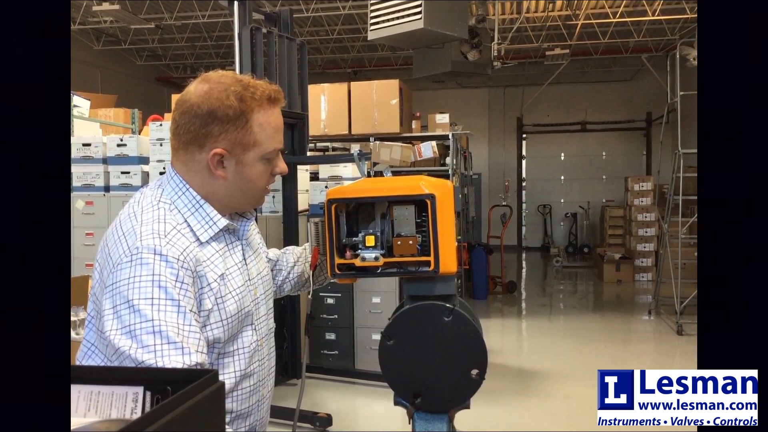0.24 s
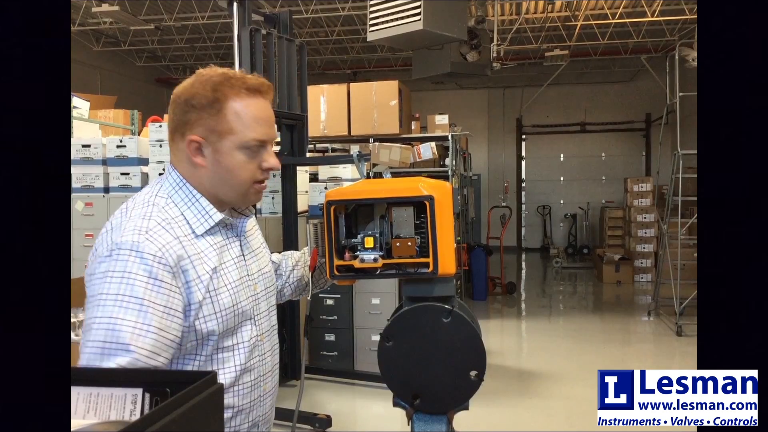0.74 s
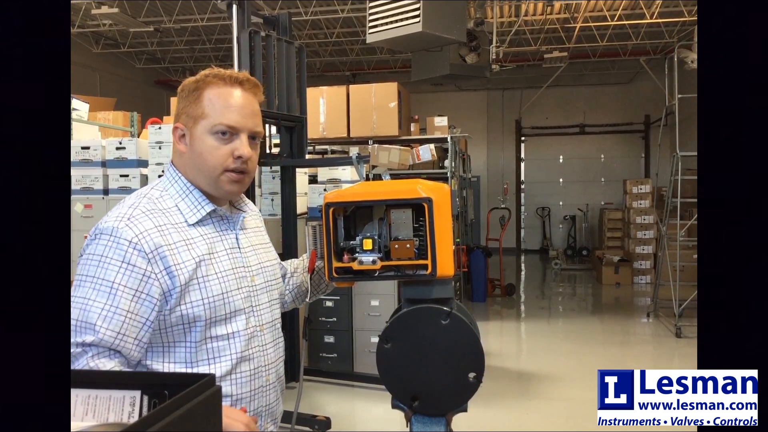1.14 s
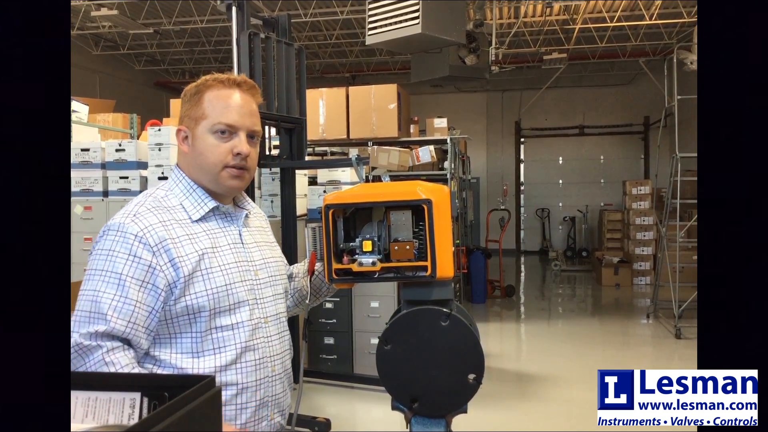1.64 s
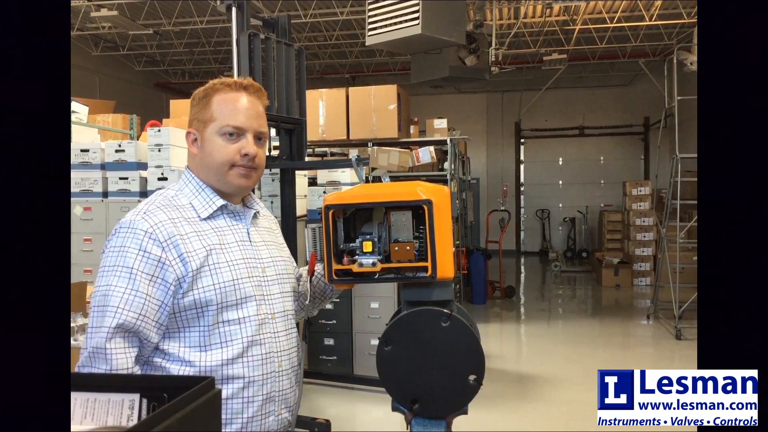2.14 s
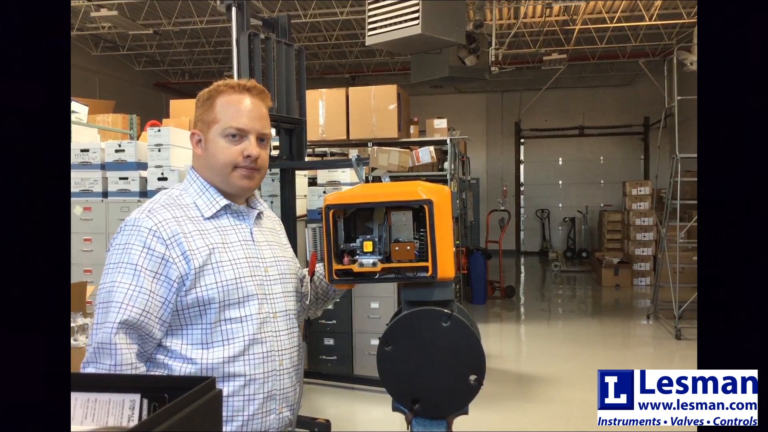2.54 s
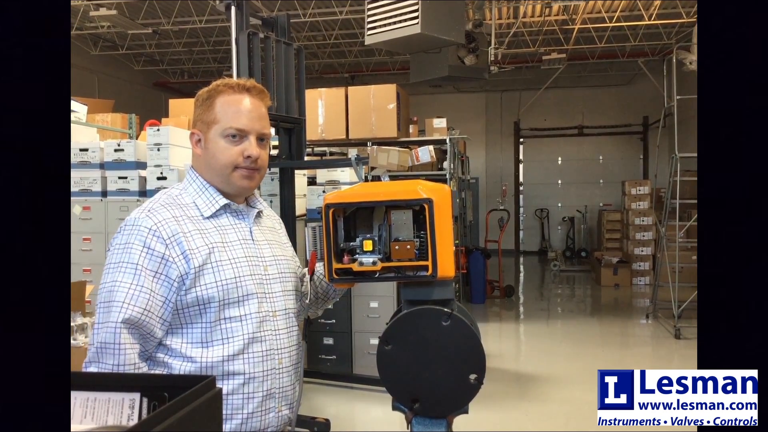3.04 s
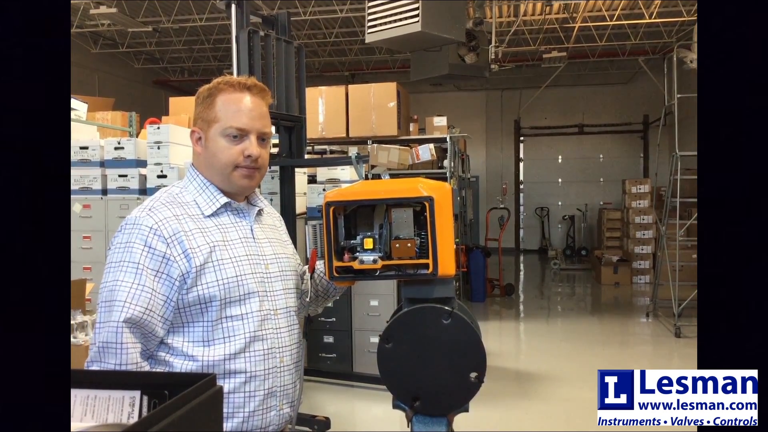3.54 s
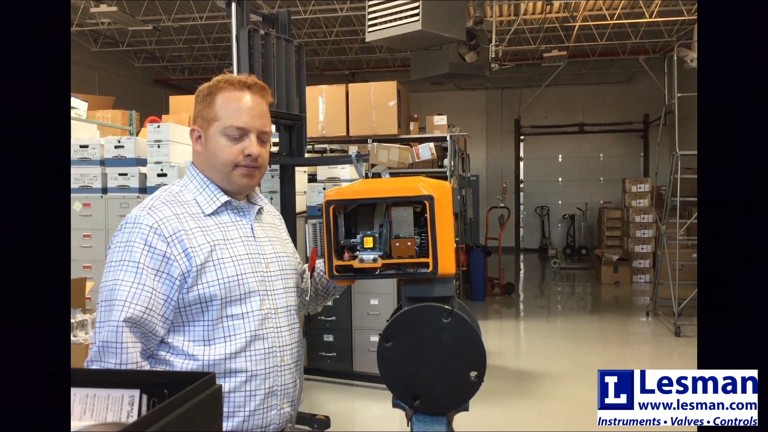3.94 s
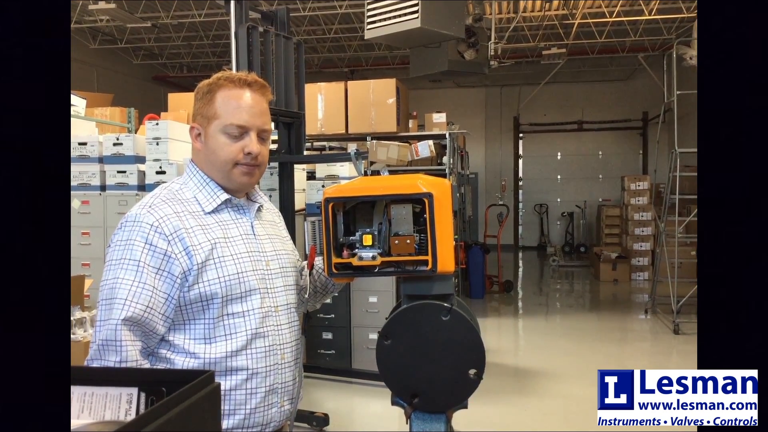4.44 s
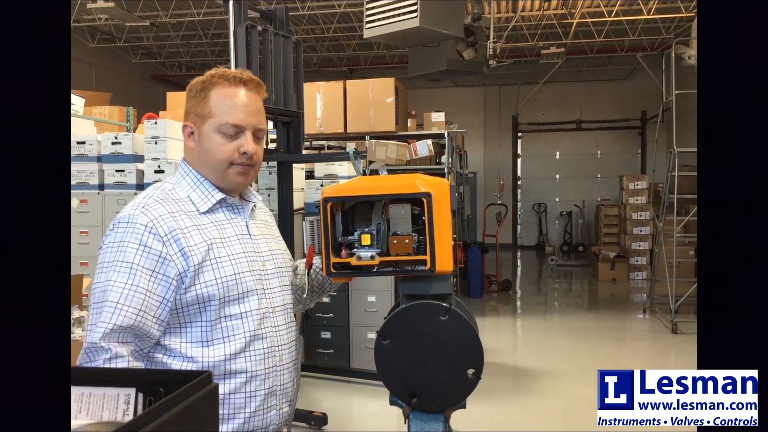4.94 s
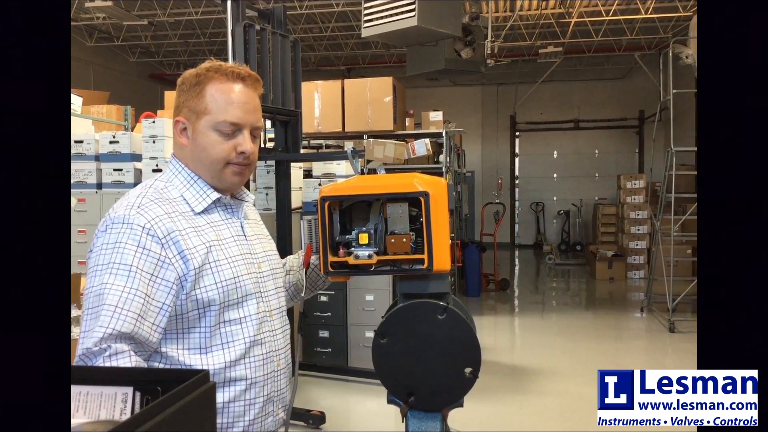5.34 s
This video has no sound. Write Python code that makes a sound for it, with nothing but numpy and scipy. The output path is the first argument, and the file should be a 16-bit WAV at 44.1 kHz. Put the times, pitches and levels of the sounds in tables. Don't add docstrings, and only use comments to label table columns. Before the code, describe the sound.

Close beside an electric valve actuator in a large reverberant warehouse, a motor whines over ventilation hum. Light ticks lead into a violent metal snap that overloads the microphone, with a hollow boom and quick rebounds. The gears then bite, a dull knock follows, and a steady hum with gritty rattle carries on, swelling slightly at the end.

```python
import sys
import numpy as np
from scipy import signal
from scipy.fft import rfft, irfft
from scipy.io import wavfile
from scipy.ndimage import uniform_filter1d

SR = 44100
rng = np.random.default_rng(int(sys.argv[2]) if len(sys.argv) > 2 else 0)


def unload_wav(signal):
    wavfile.write(
        sys.argv[1],
        SR,
        np.round(np.clip(np.atleast_2d(signal).T, -1, 1) * 32767).astype(np.int16),
    )


def elevation(decibels):
    levels = np.asarray(decibels, float)
    return 10 ** (levels / 20)


N = 246546

# (frequency [Hz], rms level [dB])
FAN_TONES = [(59.2, -56.5), (118.4, -55), (204.6, -55.5), (296.1, -53), (333.8, -58), (360.7, -63.5),
             (398.4, -72)]
# (frequency [Hz], density [dB per Hz])
AIR = [(15, -39), (25, -2), (113, -3.5), (135, -2.5), (162, -7), (205, -5), (243, -3.5), (295, -5),
       (354, -12), (436, -20.5), (515, -12.5), (584, -18), (700, -9.5), (910, -53.5), (1540, -120)]
# (multiple of the shaft [-], multiple of the 120 Hz magnet pull [-])
ORDERS = [(14, 0), (16, 0), (17, -1), (17, 0), (18, 0), (17, 1), (20, 0), (17, 2), (28, -1), (27, 0),
          (28, 0), (29, 0), (28, 1), (28, 2), (35, -1), (35, 0), (35, 1), (38, 0), (40, 0), (42, 0),
          (42, 1), (46, 0), (49, -1), (48, 0), (49, 0), (49, 1), (56, -1), (56, 0), (63, 0), (77, 1)]
# (gears just in [dB], gears seated [dB])
ORDER_LEVELS = [(-92, -64), (-59, -59.5), (-64.5, -60), (-52, -53), (-62, -66.5), (-52.5, -59.5),
                (-65, -72), (-63, -62), (-84, -66.5), (-66, -65.5), (-62, -55.5), (-61, -59),
                (-61.5, -55.5), (-64, -63.5), (-61, -59.5), (-55.5, -57), (-58.5, -63.5), (-64, -68),
                (-61, -62.5), (-64, -56.5), (-64.5, -64), (-73, -77.5), (-63, -66), (-67, -73), (-66, -61),
                (-58, -63.5), (-78, -66), (-67, -68.5), (-70, -80.5), (-70.5, -74.5)]
# (frequency [Hz], density [dB per Hz])
IDLE = [(450, -12), (660, -8), (700, 3), (740, -8), (900, -13), (1500, -12.5)]
# (frequency [Hz], density [dB per Hz])
RATTLE = [(240, -40), (400, -16), (738, -6), (952, -3), (1040, -4.5), (1290, -5.5), (1640, -3), (2020, 3.5),
          (2100, -14), (2310, 7.5), (2510, -7), (2860, -0.5), (3800, -51.5), (4940, -75.5), (8360, -120)]
# (frequency [Hz], density [dB per Hz])
HISS = [(1940, -14.5), (3300, 0), (3790, -11.5), (4150, -10), (4580, -8.5), (5350, -14), (7090, -13.5),
        (10900, -18), (13000, -24.5), (14600, -26), (15800, -27)]
# (frequency [Hz], width [Hz], level [dB])
COVER = [(3970, 57, -11.5), (4450, 63, -1.5), (5050, 48, -7.5), (6020, 140, -4.5), (6430, 42.3, -12),
         (7020, 180, -1.5), (7240, 58, -10), (8000, 52, -15), (8900, 170, -10), (9860, 250, -21)]
# (frequency [Hz], t60 [s], level [dB])
HALL = [(100, 3.4, 5), (252.2, 1.1, 10), (600, 0.83, 1), (1331, 1.03, 7.5), (2000, 1.66, 0.5),
        (3003, 0.97, 8.5), (4600, 0.96, -3), (7200, 0.29, -2.5), (11000, 0.42, -1), (15000, 0.23, -2.5)]
# (multiple of its centre [-], level [dB])
HALL_BAND = [(1 / 2.4, -14), (1, 0), (1.7, -8), (3.56, -36)]
# (frequency [Hz], density [dB per Hz])
WALLS = [(210, -17.5), (350, -3.5), (404, -13), (452, -5), (882, -7), (925, -22.5), (1420, -4.5),
         (2190, -11.5), (3410, -9.5), (3880, -11), (4200, -10.5), (4620, -13), (15800, -16)]
# (time [s], peak level [dB], brightness [dB per octave], crack decay [s], tail share [-])
BLOWS = [
    (0.2603, -28.5, 0.5, 0.028, .03),
    (0.2824, -18.5, 7.5, 0.014, .03),
    (0.311, -22, 3, 0.011, .03),
    (.3150, 6, 3, 0.0044, 0.14),
    (0.3604, -7.5, 3, 0.0085, .03),
    (.3900, -11, 1, 0.0032, .03),
    (0.4358, -18, -1, 0.008, .03),
    (1.7323, -23.5, -2, 0.0064, 0.055),
]
# (frequency [Hz], density [dB per Hz])
CRACK = [(240, -15.5), (400, -3), (544, -19.5), (917, -11.5), (1640, -2.5), (2380, -10), (2690, -12),
         (5800, -19.5), (7650, -25.5), (9480, -24), (10400, -29), (13300, -29.5), (15800, -33.5)]
# (frequency [Hz], width [Hz], level [dB])
LATCH = [(1893, 100, -3), (3660, 150, 4), (4960, 99, -0.5), (6060, 110, -6.5), (7580, 220, -23.5),
         (9150, 130, 1), (10640, 80, -13.5), (11230, 81, -4.5), (11400, 190, -9), (14800, 97, -8)]
# (frequency [Hz], width [Hz], level [dB])
METAL = [(1580, 120, -7.5), (2374, 20, -3), (3185, 110, -3), (4570, 97, -5), (5150, 240, -11.5),
         (5800, 91, -8), (6740, 160, -24), (8600, 160, -18), (9600, 100, -6.5), (11200, 230, -8.5),
         (12000, 44, -15), (13200, 81, -25), (12540, 110, -27), (13330, 110, -17)]
# (frequency [Hz], width [Hz], level [dB])
KNOCK = [(520, 160, -22), (2030, 150, 8), (2240, 86, 5), (3010, 110, -3), (3550, 95, 0), (5270, 150, -4),
         (9500, 170, -30), (10800, 98, -15), (11500, 88, -15), (12900, 110, -30)]
# (frequency [Hz], level [dB], t60 [s])
HOUSING = [(78, -36, .7), (97, -27, .8), (148, -32.5, 0.68), (196.5, -27, 0.496), (408, -28, 0.33),
           (518, -34.5, 0.34), (710, -23, 0.28)]
# (frequency [Hz], density [dB per Hz])
GRIT = [(3000, -6), (3400, 0), (4500, -1.5), (5600, -15)]
# (time [s], peak level [dB])
TICKS = [
    (1.2653, -51),
    (1.3458, -33),
]
# (frequency [Hz], width [Hz], level [dB])
TICK_RING = [(5030, 92, -0.5), (7030, 96, -9), (7820, 190, -9), (9900, 94, -13), (10800, 170, -6),
             (13700, 120, -4), (14240, 89, -6), (14700, 120, 3)]
# (frequency [Hz], density [dB per Hz])
TICK_COLOUR = [(2500, -19), (4600, -3), (6000, -13), (9000, -12), (12000, -13), (14000, -16), (15300, -8.5)]
# (frequency [Hz], density [dB per Hz])
BEARING = [(7700, -23), (8150, -4), (8600, -17)]
# (frequency [Hz], width [Hz], level [dB])
SCRAPE = [(4300, 600, 3), (5340, 260, -4), (6440, 140, -5), (7500, 1000, -10)]

SNAP_S, REBOUND_S, SECOND_REBOUND_S, KNOCK_S = [BLOWS[i][0] for i in (3, 4, 5, 7)]
SEAT_S = 0.38
FREE_HZ, BITE_S, DROP_HZ, DROP_S, CREEP_HZ, CREEP_S = 58.1, .92, .39, .066, 1.19, .55
WHEEL_HZ, WHEEL_TURN_S, WHEEL_EASY_S, CLOSING_S, CLOSING_HZ_PER_S = .17, 1.45, 3.23, 4.7, .34
FREE_SLOT_DB, FREE_SHAFT_DB, FREE_TOOTH_DB, SLOTS = 4, -4, -12, 17
RATTLE_DB, CLOSING_DB_PER_S, HISS_DB = -49.5, 5.5, -59.5
BUZZ_DB, BUZZ_DB_PER_S, DRONE_DB, DRONE_DB_PER_S = -61.5, 2, -56.5, 1.28
HOUSING_HZ, SWING_DB, SWING_RISE_S, SWING_T60_S = 292, .5, .011, .33
DIP_DB, DIP_LAG_S, DIP_S = -8, .011, .0025
THROB_DB, THROB_HZ, THROB_T60_S = -21, 21, .75


def walk(rate):
    k = int(SR / rate)
    held = np.repeat(rng.standard_normal(N // k + 1), k)
    return 1.214 * uniform_filter1d(uniform_filter1d(held, k), k)[:N]


def shaped(x, points):
    hz, db = np.transpose(points)
    bins_hz = np.arange(len(x) // 2 + 1) * SR / len(x) + 1
    gain = elevation(np.interp(np.log(bins_hz), np.log(hz), db, left=-99, right=-99))
    return irfft(rfft(x) * gain, len(x)) / np.sqrt(np.mean(gain ** 2))


def coloured(points, size):
    return shaped(rng.standard_normal(size), points)


def ring(x, hz, t60):
    pole = np.exp(2j * np.pi * hz / SR - np.log(1000) / (t60 * SR))
    return signal.lfilter([1], [1, -pole], x).imag


def parts(shake, table, damping):
    out = sum(elevation(db) * ring(shake, hz, 2.2 / (damping * width)) for hz, width, db in table)
    return out / np.max(np.abs(out))


def tones(hz, db, flutter_db, rate, rough):
    grain = 1 + rough * (walk(45) + 1j * walk(45))
    spin = np.exp(2j * np.pi * (np.cumsum(hz * np.ones(N)) / SR + rng.random()))
    return elevation(db + flutter_db * walk(rate)) * np.sqrt(2) * (grain * spin).real


def hum():
    t = np.arange(N) / SR
    buzz_db = BUZZ_DB + BUZZ_DB_PER_S * np.minimum(t, CLOSING_S)
    buzz = tones(119.9, buzz_db, 1.8, 2.0, rough=0.14)
    drone_db = DRONE_DB + DRONE_DB_PER_S * t + 1.5 * walk(8)
    drone = ring(rng.standard_normal(N), 296, .17)
    fans = sum(tones(hz, db - 2.0, 1.67, 7, rough=0.2) for hz, db in FAN_TONES if not 100 < hz < 130)
    air = elevation(-52) * coloured(AIR, N)
    return buzz + elevation(drone_db) * drone / np.std(drone) + fans + air


def shaft_hz(t):
    since = np.maximum(t - BITE_S, 0)
    bitten = 1 - np.exp(-since / DROP_S)
    wheel = WHEEL_HZ * np.cos(2 * np.pi * (t - WHEEL_EASY_S) / WHEEL_TURN_S)
    creep = CREEP_HZ * (1 - np.exp(-since / CREEP_S))
    closing = CLOSING_HZ_PER_S * np.maximum(t - CLOSING_S, 0)
    return FREE_HZ + bitten * (wheel - DROP_HZ) - creep - closing


def whine(shaft, surge_db):
    t, out = np.arange(N) / SR, 0
    turning_points = [BITE_S, BITE_S + 2 * DROP_S, KNOCK_S, KNOCK_S + SEAT_S]
    for (turns, pulls), (in_db, seated_db) in zip(ORDERS, ORDER_LEVELS):
        hz = turns * shaft + pulls * 120
        free_db = FREE_TOOTH_DB if turns > 20 else FREE_SHAFT_DB
        if turns == SLOTS:
            free_db = FREE_SLOT_DB
        db = np.interp(t, turning_points, [seated_db + free_db, in_db, in_db, seated_db])
        if turns > 20:
            out = out + tones(hz, db + 1.5 + surge_db, 1.9, 14, rough=.65)
        else:
            out = out + tones(hz, db - .6, 1.5, 5, rough=.2)
    return out


def idle():
    loose = np.clip((BITE_S + DROP_S - np.arange(N) / SR) / DROP_S, 0, 1)
    return elevation(-57) * loose * coloured(IDLE, N)


def combed(x):
    echoes = rng.standard_normal(1500) * np.exp(-np.arange(1500) / SR / .008)
    return .85 * x + .55 * signal.fftconvolve(x, echoes / np.linalg.norm(echoes))[:len(x)]


def rattle(surge_db):
    closing_db = CLOSING_DB_PER_S * np.maximum(np.arange(N) / SR - CLOSING_S, 0)
    gears = elevation(RATTLE_DB + closing_db + surge_db) * coloured(RATTLE, N)
    cover = parts(rng.standard_normal(N), COVER, 0.44)
    hiss = combed(coloured(HISS, N)) + elevation(-8.5) * cover / np.std(cover)
    return gears + elevation(HISS_DB + 0.71 * surge_db) * hiss


def grit():
    t = np.arange(N) / SR
    worn_db = 20 * np.clip((t - KNOCK_S) / .98, 0, 2) ** 2
    bitten = np.clip((t - BITE_S) / DROP_S, 0, 1)
    return elevation(-62.5 - worn_db + 2 * walk(9.04)) * bitten * coloured(GRIT, N)


def bearing():
    db = np.interp(np.arange(N) / SR, [2.2, 5.3], [-86, -71])
    return elevation(db + 2.5 * walk(5.33)) * coloured(BEARING, N)


def motor():
    t = np.arange(N) / SR
    shaft = shaft_hz(t)
    surge_db = 1.3 * walk(16)
    surge_db = surge_db - uniform_filter1d(surge_db, size=SR // 4)
    tooth_beat = .1 * np.cos(2 * np.pi * np.cumsum(shaft) * 7 / SR)
    pull = 1 + .12 * np.cos(2 * np.pi * 120 * t) + tooth_beat
    return whine(shaft, surge_db) + idle() + pull * (rattle(surge_db) + grit()) + bearing()


def hall(tilt_db, age_s):
    t, out = np.arange(SR * 2) / SR, 0
    for hz, t60, db in HALL:
        band = coloured([(hz * ratio, level) for ratio, level in HALL_BAND], len(t))
        fade_db = db + tilt_db * np.log2(hz / 2000) - 60 * (t + age_s) / t60
        out = out + np.sqrt(hz / 2000) * elevation(fade_db) * band
    return out


def earlier_snap():
    out = np.zeros(N)
    out[:SR * 2] = elevation(-33.5) * hall(1.5, 0.24)
    return out


def lever():
    near, sent, t = np.zeros(N), np.zeros(N), np.arange(16384) / SR
    metal = METAL, -7.5
    struck = [metal, (LATCH, -1.2)] + [metal] * 5 + [(KNOCK, -4.5)]
    for (s, db, tilt_db, crack_s, tail), (part, ring_db) in zip(BLOWS, struck):
        start = int(s * SR)
        colour = [(hz, level + tilt_db * np.log2(hz / 2000)) for hz, level in CRACK]
        crack = coloured(colour, len(t)) * (np.exp(-t / crack_s) + tail * np.exp(-t / .035))
        shake = rng.standard_normal(len(t)) * np.exp(-t / .004)
        ringing = elevation(db + ring_db) * parts(shake, part, 0.67)
        near[start:start + len(t)] += elevation(db - 6) * crack + ringing
        sent[start] = elevation(db - 8.0) * np.sqrt(crack_s * SR / 2)
    return near, sent


def housing():
    t = np.arange(N) / SR

    def dipped(s):
        return (1 + np.tanh((t - s - DIP_LAG_S) / DIP_S)) / 2

    since = np.maximum(t - SNAP_S, 0)
    swing_db = SWING_DB - 60 * since / SWING_T60_S + DIP_DB * dipped(REBOUND_S)
    swing = (1 - np.exp(-(since / SWING_RISE_S) ** 2)) * elevation(swing_db)
    stopped = np.maximum(t - SECOND_REBOUND_S - DIP_LAG_S, 0)
    throb = np.sin(np.pi * THROB_HZ * stopped) * elevation(THROB_DB - 60 * stopped / THROB_T60_S)
    swell = swing * (1 - dipped(SECOND_REBOUND_S - DIP_S)) + throb
    boom = swell * np.sin(2 * np.pi * HOUSING_HZ * t)
    push, knock = np.zeros(N), np.zeros(N)
    push[int(SNAP_S * SR):][:60] = np.hanning(60) / 30
    knock[int(KNOCK_S * SR):][:60] = elevation(-49.5) * np.hanning(60) / 12
    modes = sum(elevation(db) * ring(push, hz, t60) for hz, db, t60 in HOUSING)
    return boom + modes + ring(knock, 505, .45) + ring(knock, 530, .35)


def ticks():
    out, t = np.zeros(N), np.arange(4096) / SR
    for s, db in TICKS:
        start = int(s * SR)
        click = coloured(TICK_COLOUR, len(t)) * np.exp(-t / 0.0045)
        ringing = elevation(2) * parts(click, TICK_RING[-3:], .7)
        out[start:start + len(t)] = elevation(db - 4.5) * (click + ringing)
    return out


def brush():
    scrape = parts(rng.standard_normal(N), SCRAPE, 0.93)
    stroke = np.exp(-((np.arange(N) / SR - 4.745) / .03) ** 2)
    return elevation(-55.5) * scrape / np.std(scrape) * stroke


def scene():
    (blows, sent), boom, tick = lever(), housing(), ticks()
    rise = np.clip(np.arange(SR * 2) / SR / 0.01, 0, 1)
    echo = hall(0, 0) * rise * elevation(1.6 * walk(30)[:SR * 2])
    blow_echo = shaped(signal.fftconvolve(sent, echo)[:N], WALLS)
    body_echo = signal.fftconvolve(tick + elevation(-27) * boom, echo)[:N]
    wet = elevation(-54.5) * (blow_echo + body_echo)
    dry = hum() + motor() + earlier_snap() + blows + boom + tick + wet + brush()
    low_cut = signal.butter(4, 38, "high", fs=SR, output="sos")
    return signal.sosfilt(low_cut, dry)[None]


def top_cut(x):
    return signal.sosfilt(signal.butter(12, 15720, fs=SR, output="sos"), x)


def record(dry):
    top = signal.sosfilt(signal.butter(6, 15500, fs=SR, output="sos"), dry)
    return top_cut(np.clip(top, -.98, .98))


dry = scene()
out = record(dry)
unload_wav(out)
```